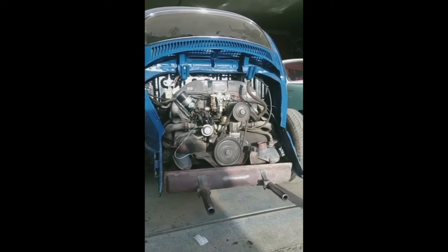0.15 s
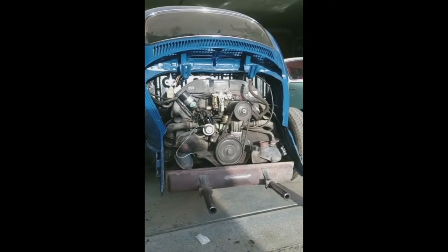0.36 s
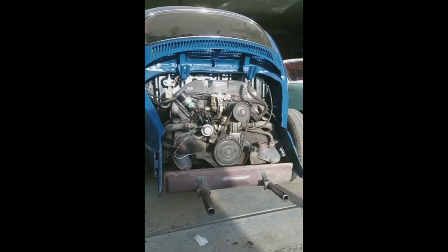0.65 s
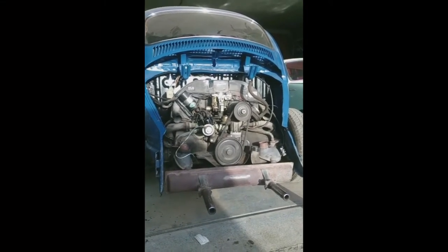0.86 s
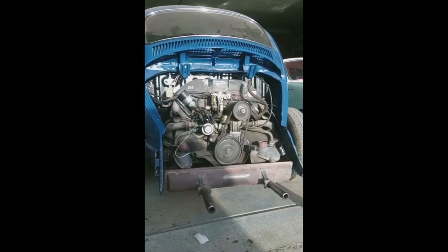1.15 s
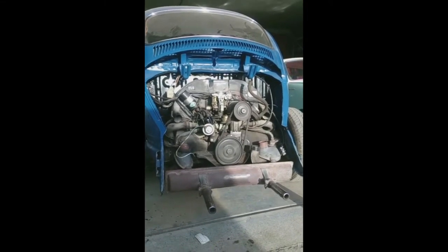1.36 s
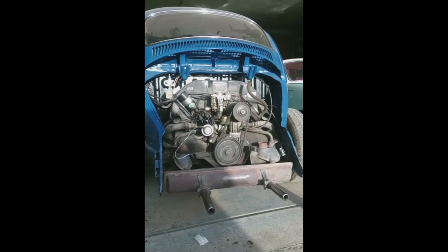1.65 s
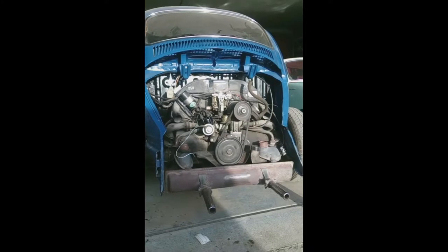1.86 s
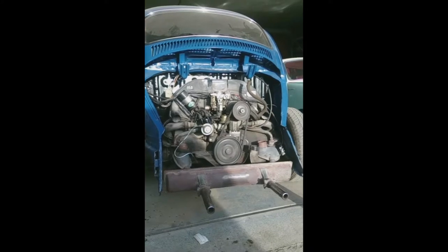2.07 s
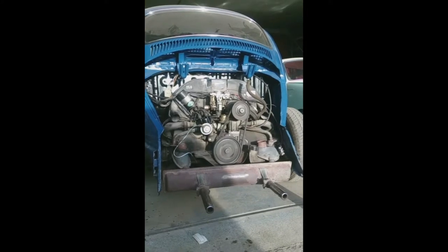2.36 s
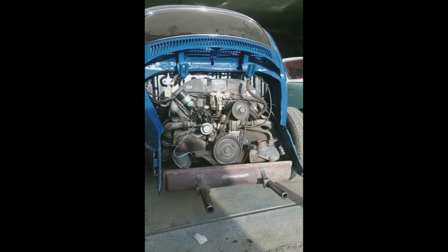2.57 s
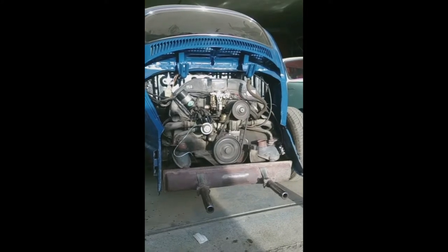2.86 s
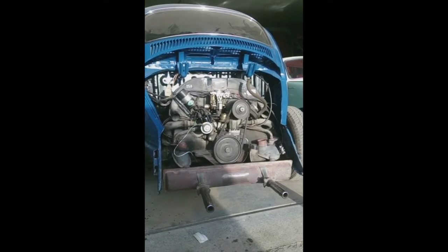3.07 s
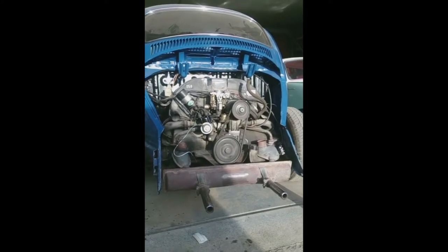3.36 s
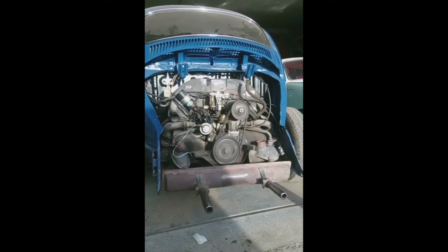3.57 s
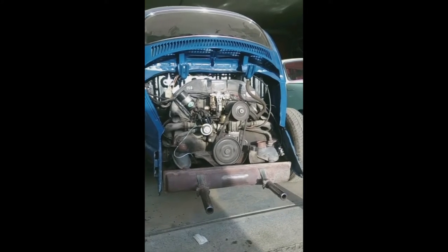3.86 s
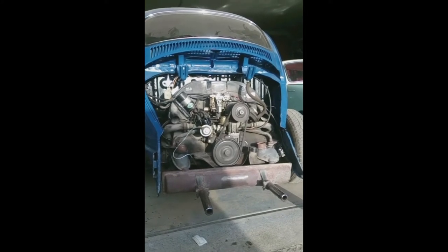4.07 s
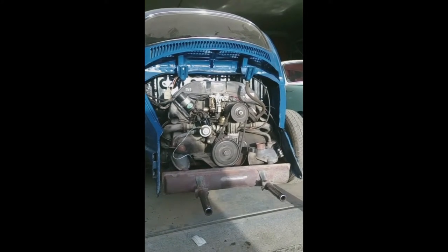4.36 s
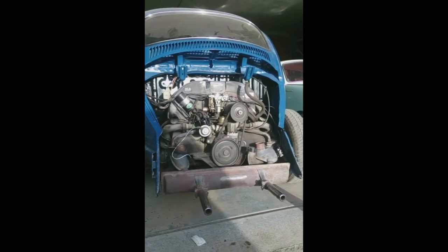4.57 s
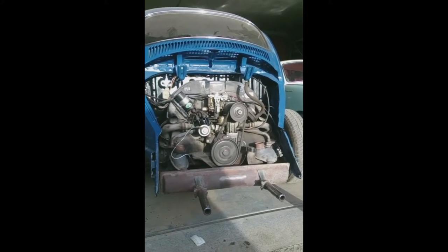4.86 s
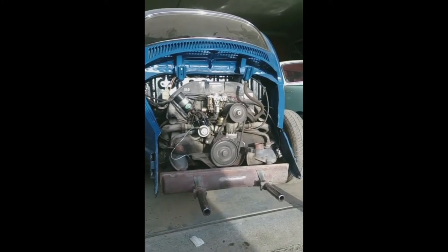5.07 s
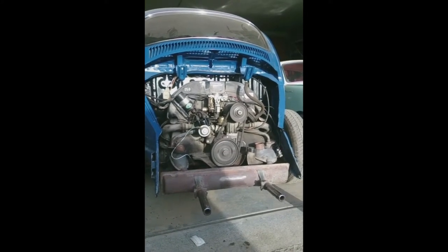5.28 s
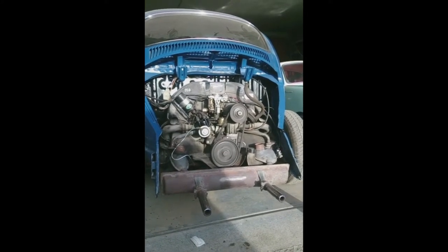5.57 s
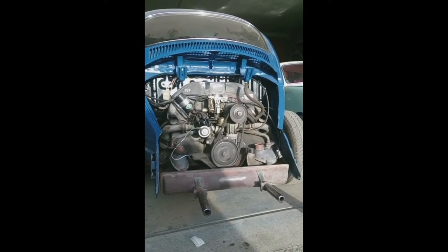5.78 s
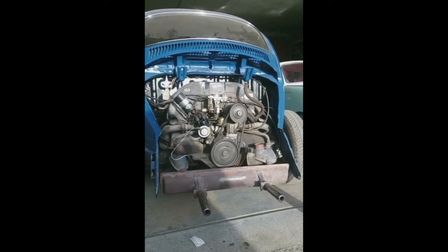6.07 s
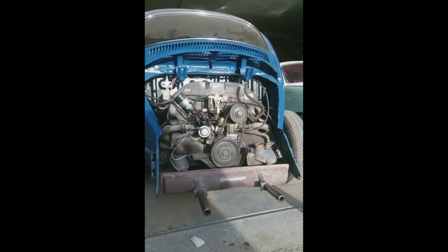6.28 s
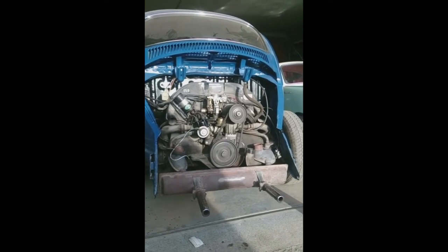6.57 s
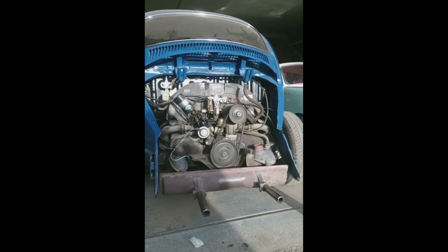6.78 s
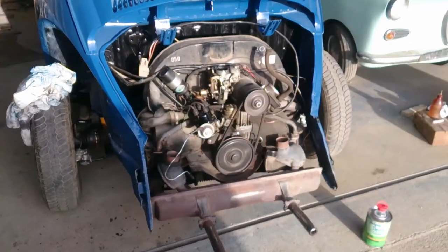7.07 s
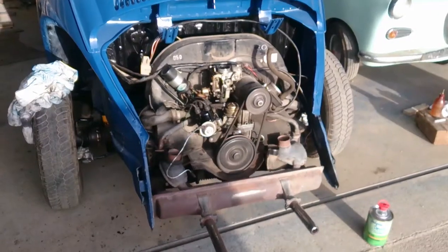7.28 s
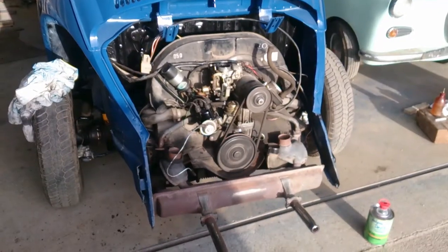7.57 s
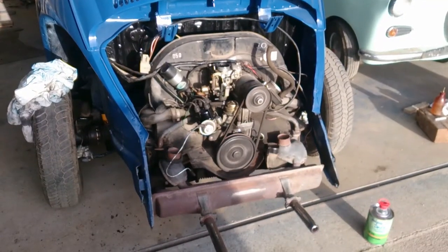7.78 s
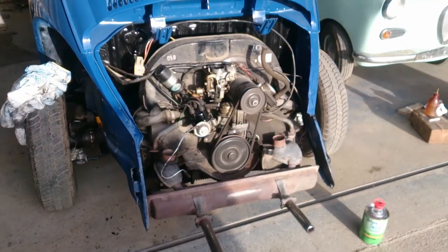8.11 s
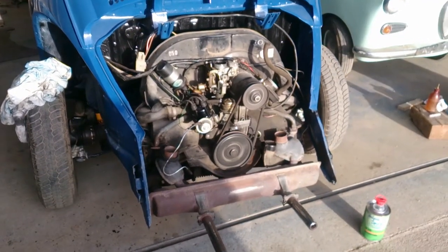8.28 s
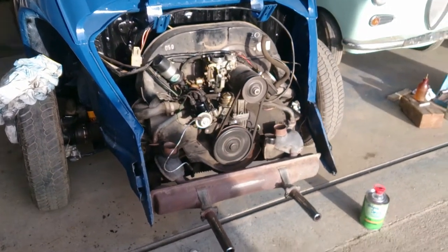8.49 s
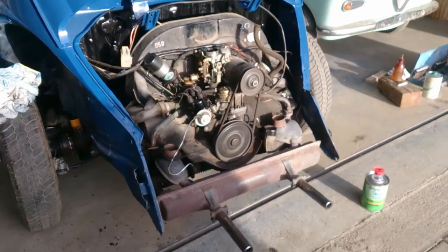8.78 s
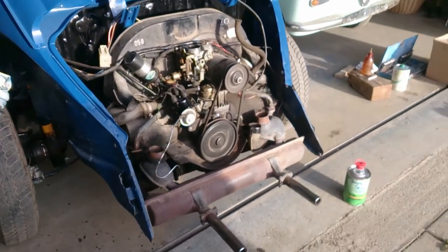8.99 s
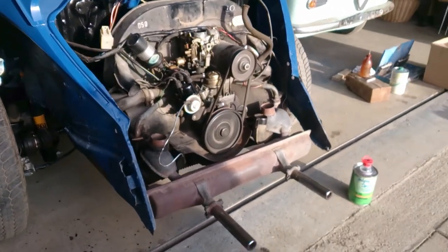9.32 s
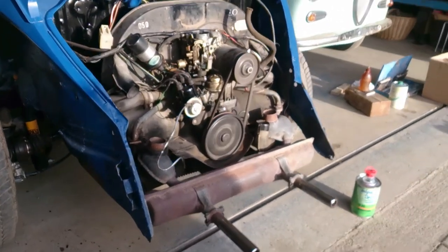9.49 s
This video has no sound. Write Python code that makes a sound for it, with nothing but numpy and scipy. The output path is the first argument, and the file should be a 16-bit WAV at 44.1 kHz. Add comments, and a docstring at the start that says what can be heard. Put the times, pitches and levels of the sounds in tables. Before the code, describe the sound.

A car engine throbs and ticks at idle over rushing fan air, dips out for a moment, then carries on a little quieter and quicker.

```python
"""An air-cooled flat-four idles at the open back of a car in a garage doorway. First, from straight behind,
exhaust pulses merge into a loping throb with the odd missed firing, over rushing fan air, rattling tinware
and ticking tappets. Near 7 s this fades out and a faster, quieter idle fades in, heard from one side.
Just after 8 s come soft thumps and a sudden drop in the lows and mids; then the listener edges closer."""
import sys
import numpy as np
from scipy import signal
from scipy.fft import rfft, irfft, next_fast_len
from scipy.io import wavfile
from scipy.ndimage import uniform_filter1d

SR = 44100
rng = np.random.default_rng(int(sys.argv[2]) if len(sys.argv) > 2 else 0)


def dump_mix(stems):
    """Bounce the given channels to the path in sys.argv[1] as a 16-bit WAV at rate SR."""
    frames = np.atleast_2d(stems).T  # one column per channel
    limited = np.clip(frames, -1, 1)  # hard clip at full scale
    pcm = np.round(limited * 32767).astype(np.int16)
    wavfile.write(sys.argv[1], SR, pcm)


N = 425565
TIME = np.arange(N) / SR


def undb(db):
    """Amplitude ratio of a level in decibels."""
    return 10 ** (np.asarray(db) / 20)

def rms(x):
    """Root-mean-square amplitude."""
    return np.sqrt(np.mean(x ** 2))

def ramp(from_s, length_s):
    """Linear rise from 0 to 1."""
    return np.clip((TIME - from_s) / length_s, 0, 1)

def colour(x, spectrum):
    """Zero-phase filtering by a curve of (frequency [Hz], gain [dB]) points."""
    hz, db = np.transpose(spectrum)
    size = next_fast_len(N)
    freq = np.maximum(np.arange(size // 2 + 1) * SR / size, 1)
    gain = undb(np.interp(np.log(freq), np.log(hz), db))
    return irfft(rfft(x, size) * gain, size)[:N]

def resonate(x, hz, width_hz):
    """Resonance: two equal band-pass stages in cascade give steep skirts."""
    b, a = signal.iirpeak(hz, hz / width_hz, fs=SR)
    return signal.lfilter(b, a, signal.lfilter(b, a, x))

def wander(rate_hz):
    """Smooth random fluctuation of unit RMS."""
    hold = int(SR / rate_hz)
    steps = np.repeat(rng.standard_normal(N // hold + 1), hold)[:N]
    smooth = uniform_filter1d(steps, hold)
    return smooth / rms(smooth)

def last_passage(cycle, cycle_hz, phase):
    """Periodic timing: the number of the cycle, and the seconds since it passed a given phase."""
    count, part = np.divmod(cycle - phase + 2, 1)
    return count.astype(int), part / cycle_hz

def impacts(cycle, cycle_hz, phase, decay_s, scatter_db, rise_s=0.00075):
    """Exponentially damped envelope of one blow a cycle, each a little different in force."""
    count, since = last_passage(cycle, cycle_hz, phase)
    force = undb(scatter_db * np.minimum(rng.standard_normal(size=256), 1.5))
    return force[count] * (1 - np.exp(-since / rise_s)) * np.exp(-since / decay_s)


# Spectrum of the cooling air (frequency [Hz], relative spectral level [dB])
SLOW_AIR = [(100, -4.5), (230, 1.5), (380, -3.5), (1000, -3), (1800, -4.5), (2450, -9.5), (3600, -8),
            (4400, -6.5), (6200, -8.5), (8000, -4.5), (9300, -17), (11300, -18.5), (13500, -20),
            (15800, -27)]
FAST_AIR = [(100, -7), (280, -2), (390, -7.5), (650, -4.5), (1400, -9.5), (1950, -9.5), (3200, -7),
            (5300, -14), (7500, -11.5), (9900, -22), (11400, -14), (12500, -6), (14000, -17),
            (15800, -14.5)]

def fan(spectrum, flutter_db=1.0):
    """Turbulence: air rushing through the shroud radiates broadband noise."""
    air = colour(rng.standard_normal(N), spectrum)
    return air / rms(air) * undb(flutter_db * wander(25))


# Modes of the castings and tinware (frequency [Hz], bandwidth [Hz], relative gain [dB])
SLOW_TIN_MODES = [(596, 89, -3.5), (729.4, 114, -1.5), (834, 49, -9), (1152, 150, -3.5), (1456, 137, -7),
                  (1692, 180, -9.5), (2138, 180, -6), (2780, 270, -15.5)]
FAST_TIN_MODES = [(475, 81, -.5), (622, 94, -0.5), (836, 130, -3.5), (1144, 240, -6.5), (1403, 105, -3),
                  (1616, 67, -3), (3140, 290, -12.5), (6570, 500, -16)]

def tinware(cycle, modes, repeat, throb):
    """Forced vibration: gears and pistons shake the metal, partly alike each cycle, pulsing as it fires."""
    points_per_cycle = 2800
    pattern = rng.standard_normal(points_per_cycle)[(cycle % 1 * points_per_cycle).astype(int)]
    shake = repeat * pattern + rng.standard_normal(N)
    shake *= 1 + throb * np.cos(8 * np.pi * cycle)  # four firings a cycle
    metal = sum(undb(db) * resonate(shake, hz, width_hz) for hz, width_hz, db in modes)
    return metal / rms(metal)


# Stray knocks and thumps (time [s], level [dB], frequency [Hz], decay time [s])
STRAY_KNOCKS = [(5.033, -13, 790, .014), (6.088, -14, 760, .016), (8.09, -7, 58, .013),
                (8.14, -15, 60, .01), (8.422, -16, 50, .01), (8.842, -21, 50, .01), (8.925, -19, 60, .01)]

def knocks(rise_s=0.0022):
    """Damped oscillation: now and then a dull knock or a soft low thump stands out."""
    out = np.zeros(N)
    for at_s, db, hz, decay_s in STRAY_KNOCKS:
        since = np.maximum(TIME - at_s, 0)
        envelope = (1 - np.exp(-since / rise_s)) * np.exp(-since / decay_s)
        out -= undb(db) * envelope * np.sin(2 * np.pi * hz * since)
    return out


# Modes of the struck steel parts (phase [cycles], level re fan [dB], frequency [Hz], decay time [s])
SLOW_STEEL_MODES = [(.47, -11, 2790, 0.015), (.49, -8, 4080, 0.014), (.5, -10, 4290, 0.014),
                    (0.4, -9, 4450, .011), (.47, -7.5, 4710, 0.0055), (.46, -8, 5600, .009),
                    (.445, -14, 5500, 0.0064), (.445, -5, 8040, .009), (.445, -5, 8420, .007),
                    (.21, -7, 7550, .008), (.21, -10, 8050, 0.0072), (.955, -5, 7870, 0.0061),
                    (.955, -8, 6900, 0.0096), (.715, -12.5, 10000, 0.012), (.72, -11.5, 2100, 0.0093),
                    (0.95, -14.5, 2200, .012), (0.97, -11.5, 725, 0.017)]
FAST_STEEL_MODES = [(0.97, -7, 3170, 0.01), (.98, -13, 4220, 0.015), (1, -14, 5000, 0.015),
                    (0.89, -12, 8310, 0.014), (0.5, -10.5, 6430, 0.013), (.45, -12, 8000, 0.016),
                    (.7, -3.5, 12000, .009), (.45, -6, 11000, .009), (.24, -12, 1620, .012)]

def steel(cycle, cycle_hz, modes, scatter_db, detune):
    """Free vibration: rockers, springs and push rods ring near their natural frequencies once a cycle."""
    out = 0
    for phase, db, hz, decay_s in modes:
        count, since = last_passage(cycle, cycle_hz, phase)
        pitch_hz = hz * (1 + detune * rng.standard_normal(size=256))[count]
        angle = 2 * np.pi * (pitch_hz * since + rng.random(size=256)[count])
        envelope = impacts(cycle, cycle_hz, phase, decay_s, scatter_db)
        out += undb(db) * envelope * np.sqrt(2) * np.sin(angle)
    return out


# Tappet ticks (phase [cycles], level re fan [dB])
SLOW_TAPPETS = [(.19, -5), (.445, -4), (.715, -5.5), (.955, -4)]
FAST_TAPPETS = [(.215, 1), (.45, -5), (.68, -8), (.96, -0.5)]
# Spectrum of a tick (frequency [Hz], relative level [dB])
SLOW_TICK = [(1500, -19), (4000, -22.5), (7500, 2), (9500, 0), (11300, -2), (13000, -3.5), (15800, -14)]
FAST_TICK = [(1500, -16), (4000, -12), (7500, 0), (9800, -6), (12400, 4), (14000, 1), (15800, -11)]
# Valve-gear blows (phase [cycles], level re fan [dB], frequency [Hz], bandwidth [Hz], decay time [s])
SLOW_BLOWS = [(.445, 4, 7700, 3600, .005), (.475, -2.5, 4270, 1470, 0.0097), (.21, -3, 8200, 900, 0.0037),
              (.955, 0, 7970, 2000, 0.0051), (0, -1.5, 680, 300, 0.0051), (.76, -3, 1220, 460, .006)]
FAST_BLOWS = [(.7, -1, 12600, 2500, 0.01), (0.95, -5.5, 4400, 2900, .008), (0.64, -2, 770, 320, 0.0031),
              (0.315, -2, 670, 290, .005)]

def valve_gear(cycle, cycle_hz, tappets, tick, blows, scatter_db=3.0, tick_decay_s=0.01):
    """Impact noise: four tappets tick in turn; heavier blows rattle heads and covers in their own bands."""
    noise = rng.standard_normal(N)
    envelope = sum(undb(db) * impacts(cycle, cycle_hz, phase, tick_decay_s, scatter_db)
                   for phase, db in tappets)
    out = colour(envelope * noise, tick) / rms(colour(noise, tick))
    for phase, db, hz, width_hz, decay_s in blows:
        noise = rng.standard_normal(N)
        envelope = impacts(cycle, cycle_hz, phase, decay_s, scatter_db)
        rattle = resonate(envelope * noise, hz, width_hz)
        out += undb(db) * rattle / rms(resonate(noise[:SR], hz, width_hz))
    return out


def chuff(cycle, cycle_hz, phase=0.675, level_db=-6.5, hz=255, swell_s=0.0038, scatter_db=1, detune=0.03):
    """Pipe resonance: one cylinder's puff booms once a cycle, giving the idle its lope."""
    count, since = last_passage(cycle, cycle_hz, phase)
    force, bend = rng.standard_normal(size=(256, 2))[count].T
    envelope = since / swell_s * np.exp(1 - since / swell_s)
    boom = np.sin(2 * np.pi * hz * (1 + detune * bend) * since)
    return undb(level_db + scatter_db * force) * envelope * boom


# Spectrum of one exhaust puff after the silencer (frequency [Hz], relative level [dB])
PUFF_SPECTRUM = [(15, -26), (30, 3), (55, -0.5), (85, 2.5), (150, -7), (230, -15.5), (400, -24), (900, -72)]
# Missed and weak firings (time [s], peak level of the missing puff [dB])
MISSED_FIRINGS = [(.536, -9), (.914, -6), (1.873, -18), (1.937, -7), (2.001, -17), (2.065, -8),
                  (3.792, -15), (3.857, -7), (4.309, -10), (4.374, -17), (4.439, -11), (4.7, -7),
                  (5.818, -15), (6.605, -17)]

def misfires():
    """Superposition: a failed firing acts as an inverted puff, leaving a hole in the throb."""
    holes, impulse = np.zeros(N), np.zeros(N)
    impulse[N // 2] = 1
    for at_s, db in MISSED_FIRINGS:
        holes[int(at_s * SR)] -= undb(db)
    return colour(holes, PUFF_SPECTRUM) / colour(impulse, PUFF_SPECTRUM).max()


# Exhaust harmonics (order [multiple of the cycle rate], relative level [dB])
SLOW_HARMONICS = [(2, -34), (3, -39), (4, 0.5), (5, -33), (6, -9), (8, -9), (10, -5), (12, -10.5),
                  (13, -22), (18, -25.5)]
FAST_HARMONICS = [(4, 0.5), (5, -19), (6, -7.5), (7, -25), (8, -6), (10, -5.5), (12, -17), (13, -12.5),
                  (14, -16), (15, -15), (16, -10), (18, -26), (20, -23)]
# Silencer resonances (frequency [Hz], bandwidth [Hz])
SLOW_SILENCER = [(143, 10), (229, 23)]
FAST_SILENCER = [(95, 18), (256, 28)]

def exhaust(cycle, cycle_hz, harmonics, silencer, puff_phase, uneven_db, jitter=0.0026, flutter_db=0.57):
    """Fourier series: periodic puffs form a harmonic note; the silencer's phase lag draws each one out."""
    angle = 2 * np.pi * (cycle - puff_phase + jitter * wander(30))
    tone = 0
    for order, db in harmonics:
        hz = order * cycle_hz.mean()
        lag = sum(2 * np.arctan2(width * hz, centre ** 2 - hz ** 2) for centre, width in silencer)
        tone += undb(db) * np.cos(order * angle - lag)
    firings = np.diff(np.floor(cycle * 4), prepend=0) > 0
    uneven = colour(firings * rng.standard_normal(N), PUFF_SPECTRUM)  # no two puffs are equally strong
    return tone / rms(tone) * undb(flutter_db * wander(12)) + undb(uneven_db) * uneven / rms(uneven)


def crank(speed, begin_s, start_phase):
    """Four-stroke cycle, two crank turns long: the running count of cycles and their rate."""
    cycle_hz = np.interp(TIME, *np.transpose(speed)) / 2
    cycle = np.cumsum(cycle_hz) / SR
    return start_phase + cycle - cycle[int(begin_s * SR)], cycle_hz

def at_listener(throb, machinery, throb_db, body_db, treble_db, split_hz=6300):
    """Spectral balance: the exhaust adds to the machinery's low and high bands, each at its own level."""
    body = signal.sosfiltfilt(signal.butter(6, split_hz, fs=SR, output="sos"), machinery)
    treble = machinery - body
    return throb * undb(throb_db) + body / rms(body) * undb(body_db) + treble / rms(treble) * undb(treble_db)


# Crank speed of the slow idle, which hunts, sags and picks up (time [s], speed [rev/s])
SLOW_SPEED = [(0.0, 32.34), (0.2, 32.59), (1.25, 31.06), (1.58, 31.45), (2.16, 30.98), (3.1, 31.44),
              (3.27, 31.06), (3.59, 31.6), (3.79, 31.01), (3.99, 31.34), (4.75, 30.38), (5.04, 30.81),
              (5.84, 29.67), (6.32, 31.21), (6.9, 31.44)]

def slow_idle(end_s=6.945, fade_s=0.21):
    """Masking: straight behind the tailpipes a heavy throb dominates the machinery, until both fade out."""
    cycle, cycle_hz = crank(SLOW_SPEED, begin_s=0, start_phase=0.073)
    machinery = fan(SLOW_AIR) + undb(-5.5) * tinware(cycle, SLOW_TIN_MODES, repeat=1.03, throb=0.36)
    machinery += valve_gear(cycle, cycle_hz, SLOW_TAPPETS, SLOW_TICK, SLOW_BLOWS)
    machinery += steel(cycle, cycle_hz, SLOW_STEEL_MODES, scatter_db=4.5, detune=0.0115)
    throb = exhaust(cycle, cycle_hz, SLOW_HARMONICS, SLOW_SILENCER, puff_phase=0.504, uneven_db=-18.5)
    throb += chuff(cycle, cycle_hz)
    bright_db = 4 * (1 - ramp(1.125, 0.03))  # the treble is brighter at first
    swell_db = ramp(4.46, 2.1)  # later the machinery gains 1 dB
    engine = at_listener(throb, machinery, throb_db=-15, body_db=-21.5 + swell_db,
                         treble_db=-27.4 + swell_db + bright_db)
    return engine * (1 - ramp(end_s - fade_s, fade_s))


# Crank speed of the fast idle, nearly steady (time [s], speed [rev/s])
FAST_SPEED = [(6.98, 34.93), (7.43, 35.3), (7.87, 35.43), (8.32, 35.44), (8.76, 35.62), (9.2, 35.31),
              (9.65, 35.8)]

def fast_idle(begin_s=6.98, fade_s=0.18, fade_floor=0.088, approach_db_per_s=0.7):
    """Unmasking: off to one side the exhaust is weaker and the bright ticking stands out."""
    cycle, cycle_hz = crank(FAST_SPEED, begin_s, start_phase=0.17)
    machinery = fan(FAST_AIR) + undb(-6.5) * tinware(cycle, FAST_TIN_MODES, repeat=0.89, throb=0.32)
    machinery += valve_gear(cycle, cycle_hz, FAST_TAPPETS, FAST_TICK, FAST_BLOWS)
    machinery += steel(cycle, cycle_hz, FAST_STEEL_MODES, scatter_db=5.0, detune=0.0166)
    throb = exhaust(cycle, cycle_hz, FAST_HARMONICS, FAST_SILENCER, puff_phase=0.011, uneven_db=-13)
    drop = ramp(8.21, 0.072)  # the lows and mids thin suddenly
    engine = at_listener(throb, machinery, throb_db=-23 - 4 * drop, body_db=-23 - 3.5 * drop, treble_db=-28)
    nearer_db = approach_db_per_s * np.maximum(TIME - 8.23, 0)  # the listener moves closer
    fade = (fade_floor + (1 - fade_floor) * ramp(begin_s, fade_s)) * (TIME > begin_s)
    return engine * undb(nearer_db) * fade


def scene():
    """Superposition: the slow idle, then the fast one, with misfires and knocks added."""
    return (slow_idle() + fast_idle() + misfires() + knocks())[None]

def record(dry, ceiling=0.95, top_hz=15800):
    """Soft saturation rounds the tallest peaks; a low-pass filter cuts the highest treble."""
    rounded = dry / (1 + (dry / ceiling) ** 4) ** 0.25
    return signal.sosfilt(signal.ellip(10, 0.2, 80, top_hz, fs=SR, output="sos"), rounded)


dry = scene()
out = record(dry)
dump_mix(out)
```